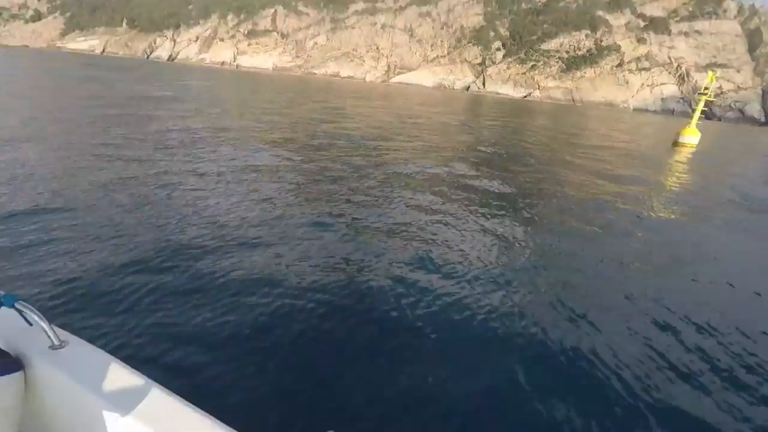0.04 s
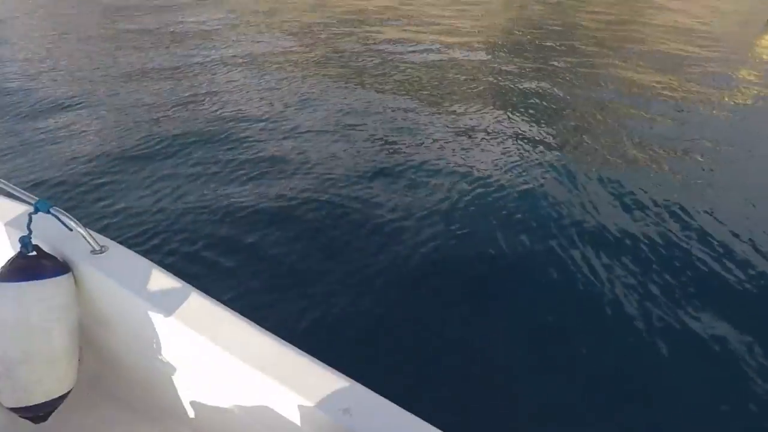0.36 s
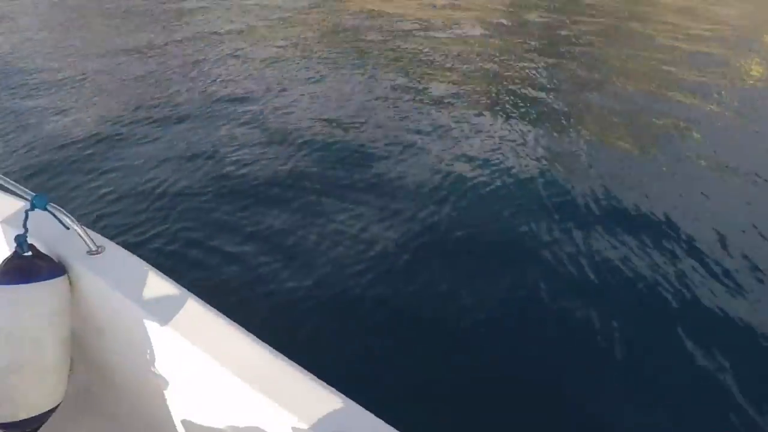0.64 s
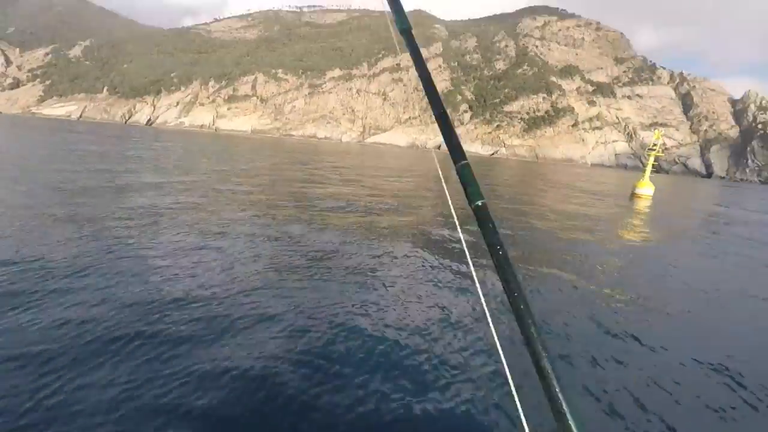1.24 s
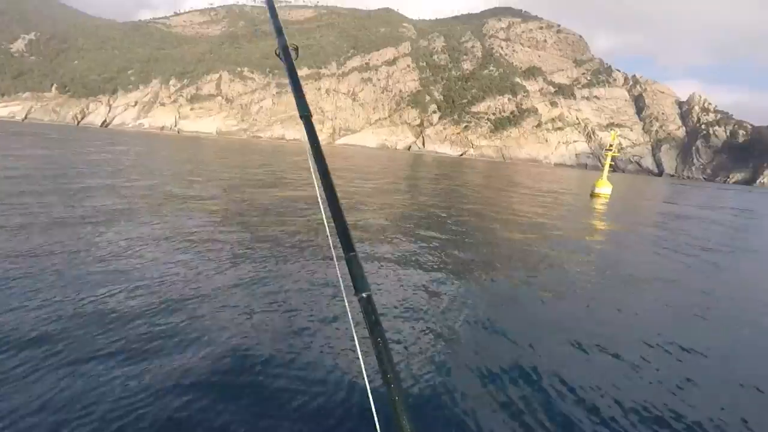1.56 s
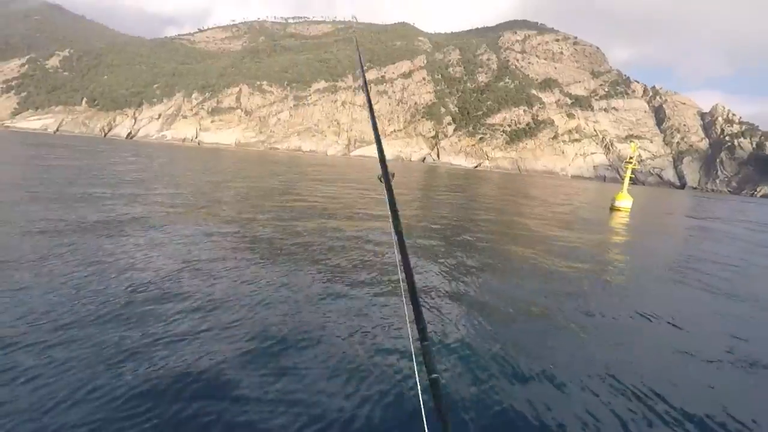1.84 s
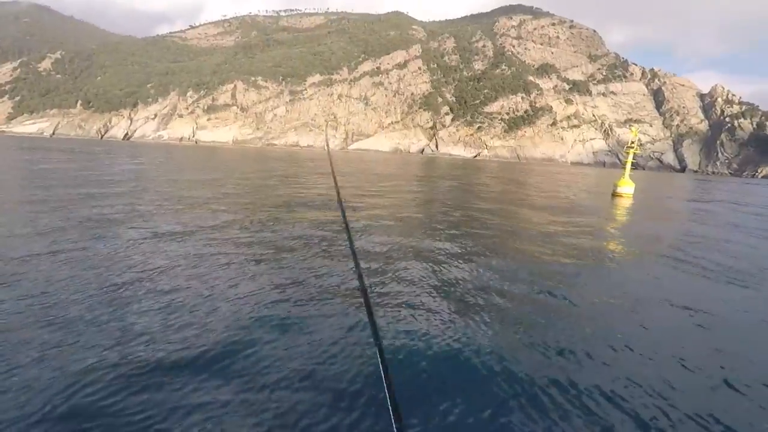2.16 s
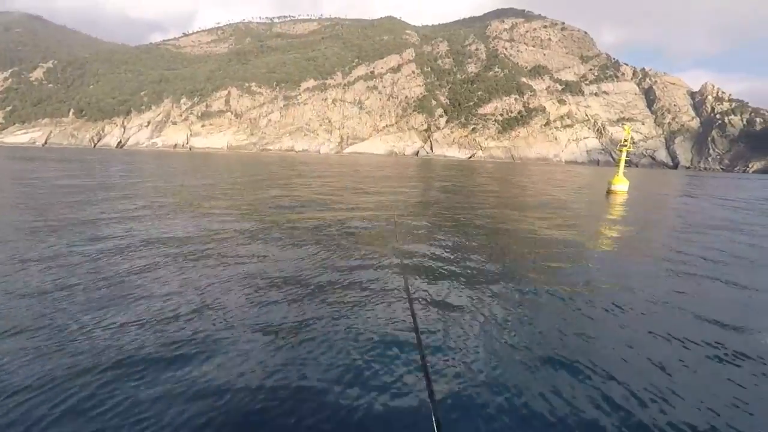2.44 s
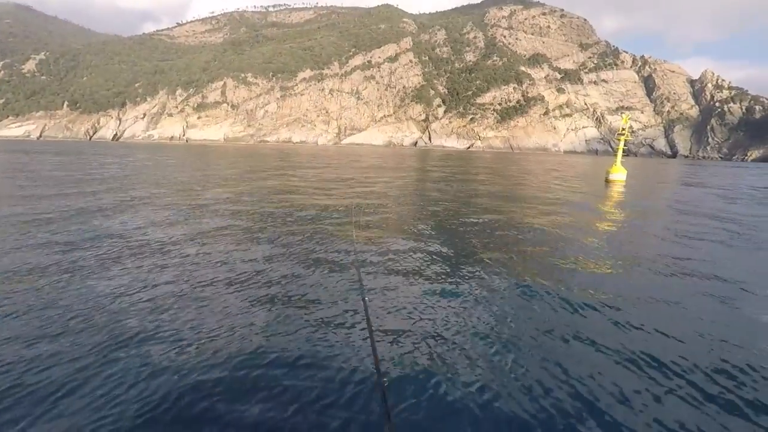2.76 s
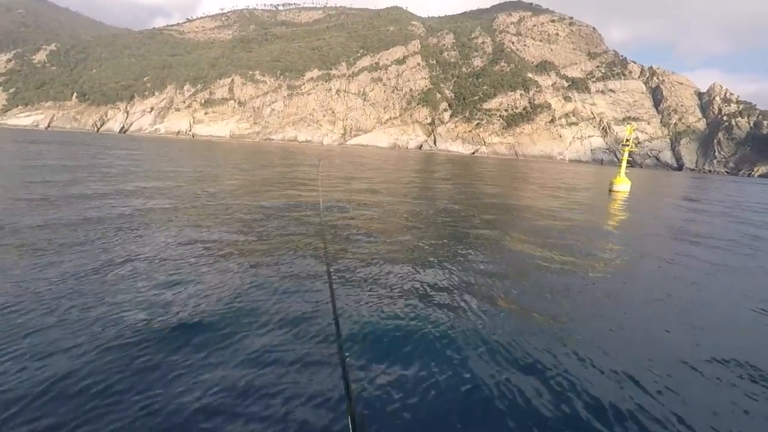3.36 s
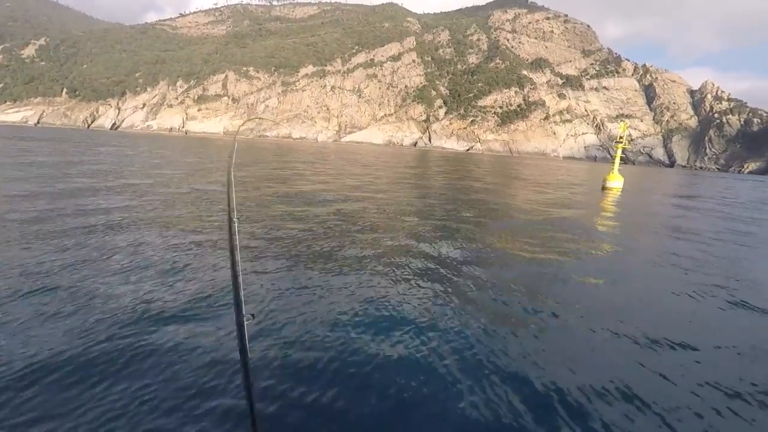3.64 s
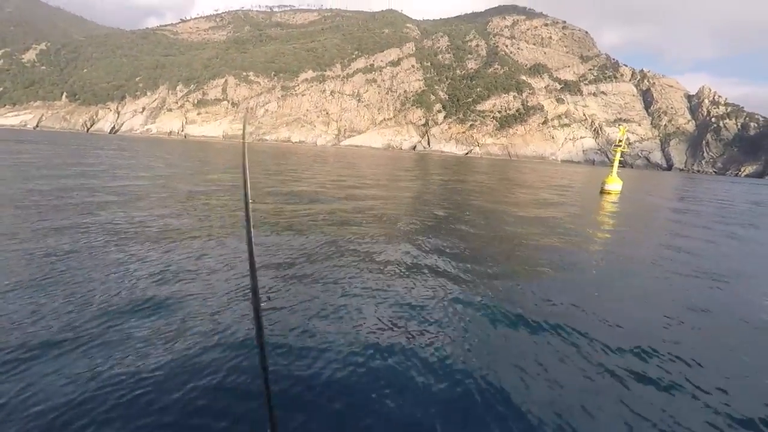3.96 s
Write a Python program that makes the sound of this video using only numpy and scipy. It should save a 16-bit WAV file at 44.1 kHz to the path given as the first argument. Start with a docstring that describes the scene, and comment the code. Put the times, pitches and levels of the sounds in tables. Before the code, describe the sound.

Fishing line zips through rod rings in short pulls, with handling bumps and wind rumble.

```python
"""On a small boat on a calm sea, fishing line runs through the rings of a rod: three pulls, four flicks.
Its texture excites the rings periodically, so it sings at a pitch that follows its speed. Friction
adds hiss, and the rod resonates most strongly near 3.8 kHz. Handling bumps, rubs and ticks reach the
body-worn microphone, with a few faint pings, over wind rumble and a soft wash of water."""
import sys
import numpy as np
from scipy import signal
from scipy.fft import rfft, irfft
from scipy.io import wavfile
from scipy.ndimage import uniform_filter1d

SR = 44100
rng = np.random.default_rng(int(sys.argv[2]) if len(sys.argv) > 2 else 0)


def output_pcm(signal):
    """Save a mono or channel-first signal as 16-bit PCM at the path in sys.argv[1].

    Samples are clipped to [-1, 1] before scaling.
    """
    pcm = np.clip(np.atleast_2d(signal).T, -1, 1) * 32767
    wavfile.write(sys.argv[1], SR, np.round(pcm).astype(np.int16))


N = 176400
TIME = np.arange(N) / SR


def from_db(db):
    """Amplitude grows tenfold with every 20 dB."""
    return 10 ** (np.asarray(db) / 20)


def rms_one(x):
    """Normalisation to unit mean power."""
    return x / np.sqrt(np.mean(x ** 2) + 1e-20)


def noise(colour):
    """Spectral shaping of white noise to unit rms. Each row: frequency in Hz, relative level in dB."""
    hz, db = np.transpose(colour)
    f = np.maximum(np.fft.rfftfreq(N, 1 / SR), 1)
    gain = from_db(np.interp(np.log(f), np.log(hz), db)) * np.minimum(f / hz[0], 1) ** 2
    return rms_one(irfft(rfft(rng.standard_normal(N)) * gain, N))


def drift(hz):
    """Low-passed noise of unit rms wanders smoothly at rates up to about hz."""
    f = np.fft.rfftfreq(N, 1 / SR)
    return rms_one(irfft(rfft(rng.standard_normal(N)) / (1 + (f / hz) ** 2), N))


def lowpass(x, hz):
    """A second-order low-pass falls 12 dB per octave above its corner."""
    return signal.sosfilt(signal.butter(2, hz, fs=SR, output="sos"), x + 1e-18)


def ring(clicks, hz, t60):
    """A damped resonator answers a unit impulse with a sine that falls 60 dB in t60 seconds."""
    radius, angle = from_db(-60 / (t60 * SR)), 2 * np.pi * hz / SR
    return signal.lfilter([0, np.sin(angle)], [1, -2 * radius * np.cos(angle), radius ** 2], clicks + 1e-18)


def ring_modes(hits, modes):
    """Modal superposition: a struck body sounds as the sum of its modes, here of alternating sign."""
    return sum((-1) ** k * from_db(db) * ring(hits, hz, t60) for k, (hz, db, t60) in enumerate(modes))


def clicks_at(s, db):
    """Single-sample impulses excite all frequencies equally."""
    clicks = np.zeros(N)
    clicks[np.clip(np.asarray(s) * SR, 0, N - 1).astype(int)] = from_db(db)
    return clicks


def swells(rows):
    """Gaussian envelopes add in power, as incoherent sounds do."""
    powers = (from_db(db) ** 2 * np.exp(-np.minimum(((TIME - s) / half) ** 2, 50))
              for s, half, db in rows)
    return np.sqrt(sum(powers))


def wind():
    """Turbulent pressure on the microphone rumbles, rising and falling with mild gusts."""
    # Two lists, before and after the hardest bump. Each row: time in seconds, relative level in dB.
    contour = [
        [(0.0, -15.5), (0.134, -31.5), (0.148, -19.5), (0.278, -16), (0.332, -17.5), (0.418, -17),
         (0.478, -25.5), (0.526, -22.5), (0.558, -27), (0.574, -26.5), (0.62, -22)],
        [(0.7, -12), (0.72, -19.5), (0.81, -25), (1.45, -14.5), (1.65, -26.5), (1.69, -17.5), (2.36, -27.5),
         (2.38, -23), (3.21, -22.5), (3.76, -27.5), (4.0, -24.5)],
    ]
    # Rumble spectrum. Each row: frequency in Hz, relative level in dB.
    spectrum = [(10, 4), (20, 2.5), (32, 0), (50, -10.5), (72, -10.5), (100, -20), (130, -38), (180, -30),
                (260, -46), (450, -48), (1000, -77)]
    s, db = np.vstack(contour).T
    gust_db = 3 * np.tanh(drift(hz=18))
    return from_db(4 + np.interp(TIME, s, db) + gust_db) * noise(spectrum)


def sea():
    """Calm water gives a broadband wash with slight, slow amplitude modulation."""
    # Wash spectrum. Each row: frequency in Hz, relative level in dB.
    spectrum = [(100, 11.5), (250, 6.5), (420, 3.5), (700, 1.5), (1300, 0), (2000, -2), (3000, -5.5),
                (4200, -6.5), (7000, -23), (15000, -20)]
    return from_db(-47 + 0.98 * drift(hz=4.2)) * noise(spectrum)


def microphone_hiss():
    """The microphone's self-noise is a steady broadband floor."""
    # Hiss spectrum. Each row: frequency in Hz, relative level in dB.
    spectrum = [(1000, -1.5), (6000, 3.5), (10000, -1.5), (15000, -8)]
    return from_db(-52.5) * noise(spectrum)


def running_line(strokes):
    """Pitch in Hz follows the line's speed; it and the amplitude glide through each stroke."""
    pitch, level = np.zeros(N), np.zeros(N)
    for stroke in strokes:
        s, hz, db = np.transpose(stroke)
        pitch += np.interp(TIME, s, hz, left=0, right=0)
        level += from_db(np.interp(TIME, s, db)) * (TIME >= s[0]) * (TIME <= s[-1])
    return uniform_filter1d(pitch, size=400), level


def sing(pitch, partials, jitter, fade_hz, flutter_db, flutter_hz):
    """Periodic excitation: the line's texture ticks over the rings, giving harmonics that each flutter."""
    unsteady_pitch = pitch * (1 + jitter * drift(hz=600))
    phase = 2 * np.pi * np.cumsum(unsteady_pitch) / SR
    tone = np.zeros(N)
    for k, db in enumerate(partials, start=1):
        gain = from_db(db + flutter_db * np.tanh(drift(flutter_hz)))
        tone += np.sqrt(2) * np.sin(k * phase) * (k * pitch < .45 * SR) * gain
    # A slow line hardly sings.
    return signal.sosfilt(signal.butter(4, fade_hz, "high", fs=SR, output="sos"), tone)


def pulls():
    """Sliding friction gives an arching whistle, hiss, and a fizz that grows with speed squared."""
    # One list per pull. Each row: time in seconds, pitch in Hz, relative level in dB.
    strokes = [
        [(-.02, 900, -50), (.03, 1300, -34), (.05, 1660, -41), (.075, 2400, -40.5), (.10, 2725, -37),
         (.15, 3600, -36.5), (.177, 3910, -42.5), (.20, 3620, -38), (.226, 3050, -36.5), (.27, 1600, -45),
         (.31, 902, -53)],
        [(.99, 777, -54), (1.065, 1900, -44.5), (1.10, 3080, -42), (1.125, 3770, -37), (1.152, 4040, -41),
         (1.171, 3930, -42), (1.179, 3800, -31.5), (1.188, 3430, -46.5), (1.225, 1880, -39), (1.255, 1000, -64)],
        [(1.76, 1011, -56), (1.83, 1730, -45.5), (1.89, 2714, -44), (1.92, 2920, -46.5), (1.955, 2715, -39.5),
         (1.98, 2390, -43), (2.003, 1850, -44), (2.04, 1000, -55)],
    ]
    # Relative levels of the first three harmonics in dB.
    partials = [-9, -9.5, -19]
    # Friction hiss and fizz spectra. Each row: frequency in Hz, relative level in dB.
    hiss_spectrum = [(500, -12), (1300, 5.5), (2500, 4), (3800, 4.5), (4600, 2.5), (6000, 0), (7500, -8),
                     (11400, -10), (15000, -12)]
    fizz_spectrum = [(7500, -20), (10400, -4), (11500, 6), (12500, -16)]
    pitch, level = running_line(strokes)
    tone = sing(pitch, partials, jitter=.023, fade_hz=2430, flutter_db=5, flutter_hz=70)
    fizz = from_db(-17.5) * (pitch / pitch.max()) ** 2 * noise(fizz_spectrum)
    hiss = from_db(-9) * noise(hiss_spectrum)
    smooth_level = uniform_filter1d(level, size=2400)
    return level * lowpass(tone, hz=6440) + smooth_level * (hiss + fizz)


def rod(x):
    """Forced vibration: the rod colours the line's sound with dense, brief modes and a few resonances."""
    # Rod resonances. Each row: frequency in Hz, bandwidth in Hz, gain in dB.
    resonances = [(2620, 120, 8), (3550, 230, 2), (3816, 156, 11), (4200, 1100, 4), (5500, 570, -2.5),
                  (8200, 490, -1.5), (9640, 320, 5)]
    cloud_t60_s, cloud_db = .025, -8
    t = TIME[TIME < cloud_t60_s]
    cloud = rng.standard_normal(len(t)) * from_db(-60 * t / cloud_t60_s)
    x = x + from_db(cloud_db) * signal.fftconvolve(x, cloud / np.linalg.norm(cloud))[:N]
    return x + sum(from_db(db) * signal.lfilter(*signal.iirpeak(hz, hz / width, fs=SR), x)
                   for hz, width, db in resonances)


def line():
    """Stick-slip friction drives the rod: scratchy pulls and flicks, and a slow rasping creep."""
    # Creeps over the rings. Each row: centre in seconds, half length in seconds, level in dB.
    creeps = [(.95, 0.022, -47), (1.01, 0.049, -47), (1.80, 0.056, -52), (2.255, 0.0076, -42.5),
              (2.277, .012, -47), (2.36, 0.011, -48.5), (2.51, 0.069, -50.5), (2.60, 0.022, -44),
              (2.67, 0.036, -48), (2.80, .012, -51), (2.87, 0.07, -56)]
    # Creep spectrum. Each row: frequency in Hz, relative level in dB.
    rasp_spectrum = [(1500, -6), (3000, -10), (3700, 0.5), (4400, -10), (6000, -10), (7500, -15),
                     (15000, -24)]
    scratch = from_db(1.4 * drift(hz=150))
    rasp = from_db(2.5 * drift(hz=110)) * noise(rasp_spectrum)
    strokes = rod(scratch * (pulls() + flicks()))
    return strokes + swells(creeps) * rms_one(rod(rasp))


def rubs():
    """Friction of clothing and grip on the housing makes short swells of grainy noise."""
    # Scuffs. Each row: centre in seconds, half length in seconds, level in dB.
    scuffs = [(.095, 0.062, -41.5), (.235, 0.016, -33), (.29, 0.022, -34), (.368, 0.016, -28.5),
              (.425, 0.026, -34.5), (.56, 0.0082, -43), (.62, 0.074, -40), (.83, 0.044, -37),
              (1.007, 0.006, -34.5), (1.07, 0.0063, -38), (1.13, 0.0071, -37), (1.289, 0.012, -30),
              (1.36, 0.021, -31), (1.435, 0.015, -30), (1.51, 0.024, -33.5), (1.59, 0.02, -34.5),
              (1.81, 0.0077, -35), (1.857, 0.018, -36.5), (2.03, .012, -41), (2.09, 0.066, -46.5),
              (2.55, .025, -45), (2.86, 0.012, -39.5), (2.927, 0.013, -36), (3.025, 0.0054, -35.5),
              (3.10, 0.0085, -36), (3.165, 0.01, -38), (3.34, 0.031, -44), (3.41, 0.0086, -43.5),
              (3.535, 0.012, -40.5), (3.61, 0.017, -47.5), (3.87, 0.021, -44), (3.935, 0.011, -38),
              (3.995, 0.014, -39)]
    # Scuff spectrum. Each row: frequency in Hz, relative level in dB.
    spectrum = [(60, 0), (170, 19.5), (300, 3.5), (500, -9), (850, 4), (1050, -4), (1300, 5.5),
                (1550, -7.5), (1900, 2), (2600, -2), (3100, -12.5), (4200, -11.5), (6500, -21), (9000, -41),
                (15000, -54)]
    return swells(scuffs) * rms_one(noise(spectrum) * from_db(1.5 * drift(hz=130)))


def ticks():
    """Small hard impacts excite the quickly damped modes of the plastic."""
    # Contacts. Each row: time in seconds, impulse level in dB, low-pass corner in Hz.
    contacts = [(0.227, -22.5, 3000), (.418, -28.5, 3000), (0.4388, -21.5, 3500), (0.445, -23, 2170),
                (0.642, -3, 740), (0.7, -6.5, 746), (1.279, -31, 2500), (1.3647, -16, 2950),
                (1.367, -24.5, 2530), (1.431, -29, 3500), (1.530, -27, 3500), (3.602, -41, 2940)]
    # Plastic modes. Each row: frequency in Hz, gain in dB, time to fall 60 dB in seconds.
    modes = [(850, -4.5, 0.018), (1020, 0, 0.012), (1273, 1, 0.014), (1700, 0.5, 0.012), (2427, -1, 0.014)]
    hits = sum(lowpass(lowpass(clicks_at(s, db), hz), hz) for s, db, hz in contacts)
    return ring_modes(hits, modes)


def bumps():
    """Soft impacts carry mostly low frequencies, so the microphone housing booms and knocks."""
    # Blows. Each row: time in seconds, boom drive in dB, knock drive in dB, low-pass corner in Hz.
    blows = [(.357, -18, -15, 300), (0.379, -9, -11, 300), (0.42, -23, -20, 298), (0.647, 6.5, 1, 650),
             (1.282, -10, -6.5, 231), (1.347, -41, -13, 218), (1.416, -34, -5.5, 218),
             (1.4358, -7, 2.5, 174), (1.507, -24, -20, 220), (1.589, -14.5, -10, 210),
             (1.856, -52, -15, 214), (2.331, -35, -22.5, 220), (2.625, -11.5, -46, 120),
             (2.935, -13, -17.5, 250), (3.094, -42, -25.5, 252)]
    # Housing modes. Each row: frequency in Hz, gain in dB, time to fall 60 dB in seconds.
    modes = [(116, -15, 0.12), (173.6, -2.5, 0.06), (223, -18, 0.049), (321, -21.5, 0.057),
             (435, -15.5, 0.037), (610, -24, 0.057)]
    booms = sum(lowpass(clicks_at(s, db), hz) for s, db, _, hz in blows)
    knocks = sum(lowpass(clicks_at(s, db), hz) for s, _, db, hz in blows)
    return ring(booms, hz=73, t60=0.112) + ring_modes(knocks, modes)


def pings():
    """The free decay of one very high resonance is heard as a faint ping."""
    # Pings. Each row: start in seconds, level in dB.
    onsets = [(.828, -42.5), (1.041, -45), (2.603, -47)]
    return ring(clicks_at(*np.transpose(onsets)), hz=10400, t60=0.028)


def flicks():
    """Intermittent contact: a flicked line skips on the rings, so its two tones break up amid hiss."""
    # One list per flick. Each row: time in seconds, pitch in Hz, relative level in dB.
    strokes = [
        [(2.695, 6000, -47), (2.71, 11040, -42), (2.723, 14200, -42), (2.738, 13000, -40), (2.755, 7890, -40),
         (2.775, 5920, -45), (2.793, 4050, -47.5), (2.815, 3600, -49), (2.835, 1800, -47)],
        [(2.94, 8000, -57), (2.95, 9280, -40.5), (2.973, 10750, -39), (2.99, 8200, -39), (3.005, 6060, -45),
         (3.03, 5640, -44), (3.052, 4980, -45), (3.07, 3416, -48), (3.10, 1900, -53)],
        [(3.21, 5480, -62), (3.225, 6840, -44), (3.25, 7310, -41), (3.268, 4950, -51), (3.29, 3000, -53)],
        [(3.94, 2470, -58), (3.952, 3930, -47), (3.96, 5300, -46.5), (3.977, 6700, -49), (4.0, 6220, -50)],
    ]
    # Relative levels of the first two harmonics in dB.
    partials = [-11, -10.5]
    # Friction hiss spectrum. Each row: frequency in Hz, relative level in dB.
    spectrum = [(500, -26), (1500, 7), (3000, -8), (5700, 3.5), (6800, -16), (8000, 7.5), (9700, -1),
                (11500, 0.5), (15000, 0.5)]
    pitch, level = running_line(strokes)
    texture = dict(jitter=.026, fade_hz=3760, flutter_db=9, flutter_hz=130)
    main_tone = sing(pitch, partials, **texture)
    lower_tone = from_db(-9.5) * sing(0.73 * pitch, partials, **texture)
    return level * (main_tone + lower_tone + from_db(-5) * noise(spectrum))


def scene():
    """Superposition: all sources add at one microphone."""
    return (line() + rubs() + ticks() + bumps() + pings() + wind() + sea() + microphone_hiss())[None]


def record(dry):
    """Overload: the hardest bump clips the input, and a steep low-pass limits the bandwidth."""
    cutoff_hz = 15300
    treble_cut = signal.ellip(12, .1, 90, cutoff_hz, fs=SR, output="sos")
    return signal.sosfilt(treble_cut, np.clip(dry, -1, 1))


dry = scene()
out = record(dry)
output_pcm(out)
```